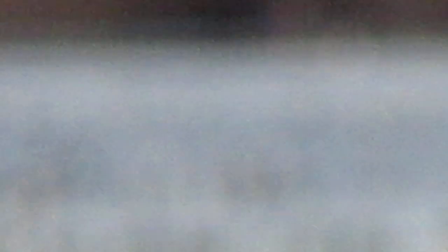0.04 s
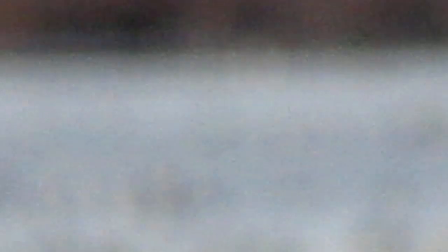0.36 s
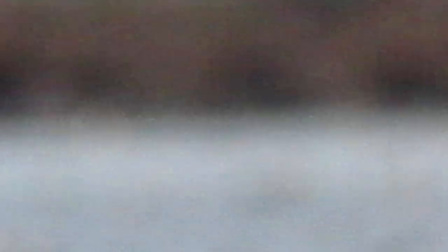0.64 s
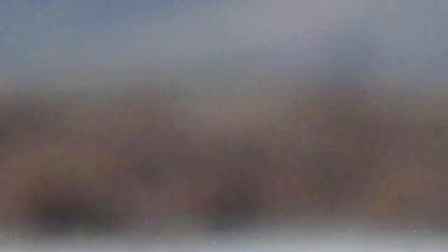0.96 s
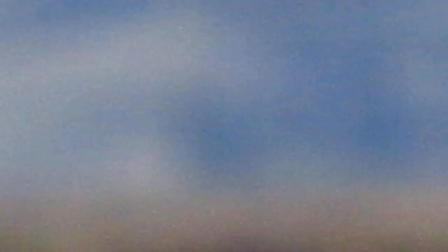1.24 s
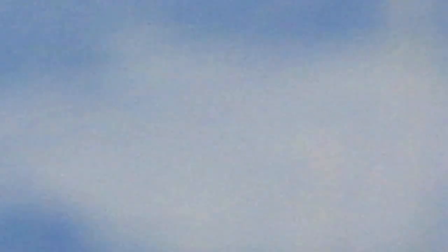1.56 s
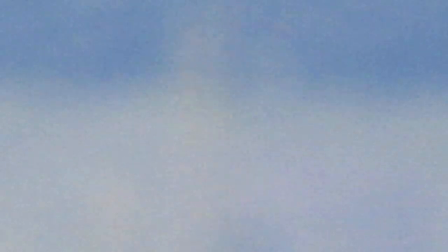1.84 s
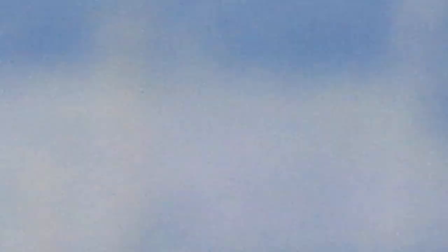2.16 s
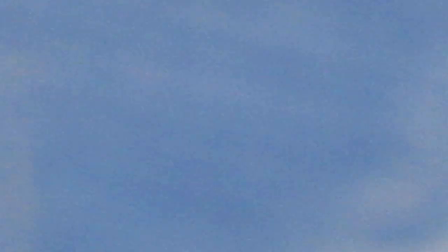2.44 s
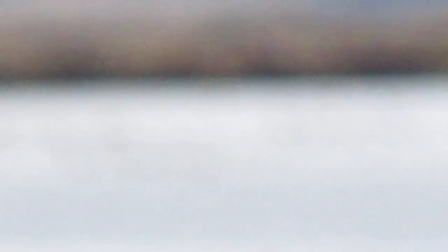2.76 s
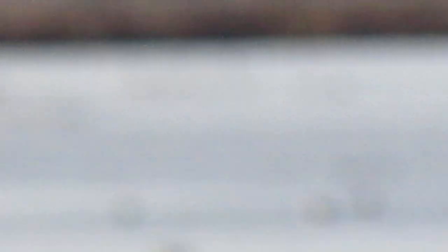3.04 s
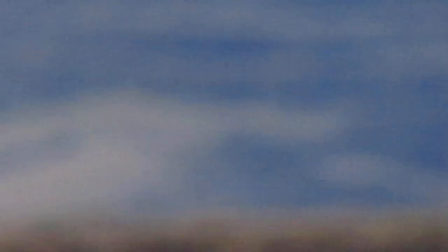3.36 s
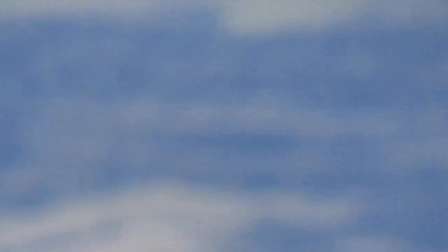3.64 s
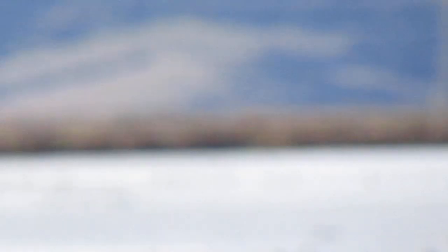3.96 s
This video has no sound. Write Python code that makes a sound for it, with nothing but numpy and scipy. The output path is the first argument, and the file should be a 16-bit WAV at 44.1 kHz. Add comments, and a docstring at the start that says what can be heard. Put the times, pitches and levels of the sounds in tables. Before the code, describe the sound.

A curlew gives a quick run of short rising whistles over open ground, then sparser ones. Strong wind rushes and buffets the microphone throughout. Midway, a hand faintly rubs and taps the camera, with one hard click.

```python
"""From the start, turbulent wind rushes and buffets the microphone, and the camera whines faintly.
A curlew gives a quick run of whistles over open ground, then sparser ones: each tone climbs, breaks
into a higher register, arches and drops. From about 1.9 s a hand rubs and taps the camera, exciting
the modes of its casing; the hard click at 2.2 s makes the gain control duck, hold and recover.
One more whistle follows at once, and a last, faint one sounds through the wind at 3.6 s."""
import sys
import numpy as np
from scipy import signal
from scipy.fft import rfft, irfft, next_fast_len
from scipy.io import wavfile
from scipy.ndimage import uniform_filter1d, minimum_filter1d, map_coordinates

SR = 44100
rng = np.random.default_rng(int(sys.argv[2]) if len(sys.argv) > 2 else 0)


def unload_audio(sound):
    """Save the sound as a 16-bit wav file, at the path given as the first command line argument."""
    columns = np.transpose(np.atleast_2d(sound))
    # keep every value between -1 and 1, then stretch to whole-number steps
    steps = np.round(np.clip(columns, -1, 1) * 32767)
    wavfile.write(sys.argv[1], SR, steps.astype(np.int16))


N = 176400

# Levels in all tables are relative.
# Whistles: start t/s, break t/s, end t/s, opening f/Hz, pre-break f/Hz, top f/Hz, exponent of the climb,
# lower note level/dB, upper note level/dB, lower note's overtone level/dB, lead-in level/dB
CURLEW_WHISTLES = [(.078, .126, .182, 2450, 2810, 3275, .75, -38, -39.3, -20, -50),
                   (.195, .252, .321, 2470, 2790, 3225, 1.5, -40.5, -41.3, -20, -60),
                   (.396, .450, .521, 2360, 2755, 3262, .9, -36.7, -38, -15, -48),
                   (.616, .666, .757, 2440, 2800, 3330, 1.1, -36.3, -41.3, -22, -62),
                   (.790, .820, .856, 2480, 2750, 3190, 1.3, -53, -52, -20, -75),
                   (.875, .915, .953, 2420, 2740, 3155, .6, -38, -41.7, -13, -45.5),
                   (.976, 1.027, 1.114, 2470, 2750, 3275, 1.4, -37.3, -40.5, -21, -57),
                   (1.399, 1.450, 1.526, 2440, 2790, 3365, 1.25, -37.5, -39.3, -21, -62),
                   (1.941, 1.987, 2.061, 2510, 2830, 3435, 1.1, -36.3, -40, -22, -65),
                   (2.344, 2.394, 2.463, 2470, 2800, 3348, 1.6, -37.5, -41.7, -20, -65),
                   (3.590, 3.616, 3.677, 2440, 2700, 3170, 1.6, -47, -48.5, -25, -72)]
RUSH_ENVELOPE = [(0, -30), (.4, -28.5), (.85, -31), (1.2, -30), (1.4, -29), (1.8, -30), (2.1, -30),
                 (2.9, -31), (3.15, -29.5), (3.35, -30.5), (3.6, -30), (4, -31.5)]  # strength of the wind: t/s, level/dB
RUSH_SPECTRUM = [(20, -33.5), (45, -8.5), (80, -6.5), (130, -10.5), (200, -6), (270, -6.5), (360, -7.5),
                 (460, -15), (560, -12.5), (650, -8), (780, -7), (950, -14), (1300, -18.5), (1600, -25.5),
                 (2000, -29.5), (2600, -48.5), (4400, -89)]  # its spectral density: f/Hz, level/dB
WIND_RESONANCES = [(87.5, 23, -41.5), (165.2, 9.4, -35.5), (328.5, 12.7, -39)]  # hollow bands in the wind: f/Hz, half-width/Hz, level/dB
RUSTLE_ENVELOPE = [(0, -63), (.45, -62), (1.15, -63), (1.5, -62.5), (2.1, -61.5), (2.4, -62.5),
                   (2.9, -64.5), (3.5, -64), (4, -64.5)]  # strength of the grass rustle: t/s, level/dB
RUSTLE_SPECTRUM = [(800, -46), (1800, 4), (2500, 5.5), (3400, 1), (4300, -4), (5500, -11.5), (7200, -12.5),
                   (8000, -15.5), (10000, -17), (12000, -20), (14800, -23.5)]  # its spectral density: f/Hz, level/dB
GUST_ENVELOPE = [(0, -28.5), (.6, -33.5), (.72, -26.5), (.88, -30.5), (1.28, -24.5), (1.33, -26.5),
                 (1.45, -22), (1.5, -29.5), (1.7, -25), (1.75, -21.5), (1.92, -24.5), (2.2, -29),
                 (2.7, -28.5), (3.2, -30), (3.28, -21.5), (3.55, -29), (3.7, -25), (4, -27)]  # rumble of gusts on the microphone: t/s, level/dB
GUST_SPECTRUM = [(20, -11.5), (50, -18.5), (88, 2), (125, -4), (170, -4), (260, -5.5), (400, -18.5),
                 (800, -20.5), (2000, -70), (6000, -89.5)]  # its spectral density: f/Hz, level/dB
EDDIES = [(.716, 110, -15.5), (1.33, 104, -12.5), (1.346, 151, -10.5), (1.389, 137, -11), (1.409, 168, -10),
          (1.429, 220, -9.5), (1.436, 129, -9.5), (1.462, 232, -11.5), (1.5518, 746, -16.5),
          (1.733, 103, -17.5), (1.902, 132, -11.5), (2.114, 133, -15.5), (2.444, 96, -16.5),
          (3.267, 140, -16.5), (3.411, 138, -13.5)]  # single eddies at the microphone: t/s, f/Hz, peak level/dB
TAPS = [(1.8735, -23.5), (1.945, -34), (1.9486, -42), (1.9575, -44), (2.0088, -39), (2.0416, -32),
        (2.053, -43), (2.066, -45), (2.0886, -35), (2.1122, -43), (2.2202, 2), (2.2364, -43)]  # contacts on the casing: t/s, level/dB
CASING_MODES = [(700, -20, 0.0073), (1240, -21.5, 0.0101), (1930, -22.5, 0.015), (2415, -22, 0.013),
                (3730, -18, 0.0056), (5050, -24, 0.015), (5990, -22, 0.007), (7140, -14.5, 0.0044),
                (10000, -7.5, 0.0033), (11700, -2, 0.0032), (13100, -13, 0.0044)]  # free vibrations of the casing: f/Hz, level/dB, T60/s
RUB_ENVELOPE = [(1.9, -82), (1.99, -61), (2.08, -55.5), (2.15, -57), (2.2, -56.5), (2.255, -58.5),
                (2.29, -72)]  # friction of the hand: t/s, level/dB
RUB_SPECTRUM = [(2000, -27.5), (5000, -4), (8000, -3), (10000, 2), (12000, -2.5), (14500, -11.5)]  # its spectral density: f/Hz, level/dB
WHIRR_SPELLS = [(1.895, 1.94), (2.43, 2.5), (3.67, 3.75), (3.85, 3.92)]  # the camera's lower tone: start t/s, end t/s


def curlew():
    """Frequency modulation: a soft lead-in, a climbing tone, then a register break to a falling arch."""
    lead_s, attack_s, break_s, drop_s, release_s = .036, .003, .0011, .006, .0054
    lead_hz, rise_hz, drop_hz = 1790, 330, 860
    lead_swell_db, fade_db = 6, 4.5
    jitter, shimmer_db = 1 + .0041 * wobble(250), 1.1 * wobble(150)
    out = np.zeros(N)
    for (start, flip, end, open_hz, break_hz, top_hz, bend,
         lower_db, upper_db, overtone_db, lead_db) in CURLEW_WHISTLES:
        n = np.arange(int((start - lead_s) * SR), int(end * SR))
        t = n / SR
        stages = [(t[0], start), (start, flip), (flip, end)]
        early, low, high = (np.clip((t - a) / (b - a), 0, 1) for a, b in stages)  # progress, 0 to 1
        phase = lambda hz: 2 * np.pi * np.cumsum(hz * jitter[n]) / SR
        slide = phase(lead_hz + rise_hz * early ** 2)
        climb = phase(open_hz + (break_hz - open_hz) * low ** bend)
        arch = phase(top_hz - 290 * (high - .42) ** 2 - drop_hz * np.exp((t - end) / drop_s))
        lead = np.sin(slide) + amp(-10) * np.sin(2 * slide)
        lead *= amp(lead_db + lead_swell_db * (early - .5))
        lower = np.sin(climb) + amp(overtone_db) * np.sin(2 * climb)
        lower *= amp(lower_db - 7 * bend * (1 - low) ** 2)  # swells as it climbs
        upper = np.sin(arch) + amp(-30) * np.sin(2 * arch) + amp(-36) * np.sin(3 * arch)
        upper *= amp(upper_db - fade_db * high)
        onset = np.clip((t - start) / attack_s + .5, 0, 1)
        flipped = .5 + .5 * np.tanh((t - flip) / break_s)  # the registers overlap briefly
        edges = np.clip((t - t[0]) / attack_s, 0, 1) * np.clip((end - t) / release_s, 0, 1)
        voice = (1 - onset) * lead + onset * (1 - flipped) * lower + flipped * upper
        out[n] += np.sqrt(2) * amp(shimmer_db[n]) * edges * voice
    return out


def ground_scatter(x, t60_s=.4, tail_db=-26):
    """Scattering from open ground adds a weak, exponentially decaying tail."""
    t = np.arange(SR // 2) / SR
    tail = rng.standard_normal(len(t)) * amp(-60 * t / t60_s)
    return x + amp(tail_db) * signal.fftconvolve(x, tail / np.linalg.norm(tail))[:N]


def wind():
    """Turbulence gives broadband noise: a rush with narrow resonances, and a faint rustle above it."""
    level = curve(RUSH_ENVELOPE)
    rush = amp(level + 2.5 + .47 * wobble(11)) * coloured(noise(), RUSH_SPECTRUM)
    hollow = sum(amp(db) * unit(filtered(noise(), lambda f: 1 / (1 + ((f - hz) / width) ** 2)))
                 for hz, width, db in WIND_RESONANCES)
    rustle = amp(curve(RUSTLE_ENVELOPE) + 11.5 + .4 * wobble(15)) * coloured(noise(), RUSTLE_SPECTRUM)
    return rush + amp(level - level.mean()) * hollow + rustle


def buffeting():
    """Pressure fluctuations of gusts on the microphone make a low, uneven rumble."""
    level = curve(GUST_ENVELOPE)
    swing = level - level.mean()
    lumps = unit(amp(2.16 * wobble(45)) * coloured(noise(), GUST_SPECTRUM))
    return amp(level.mean() - 3 + 1.02 * swing) * lumps


def eddy_thumps(width_cycles=.22):
    """A passing eddy is a bipolar pressure pulse: one quick pull and push of air."""
    out, t = np.zeros(N), np.arange(-SR // 25, SR // 25) / SR
    for s, hz, db in EDDIES:
        pulse = np.sin(2 * np.pi * hz * t) * np.exp(-.5 * (hz * t / width_cycles) ** 2)
        out[round((s + t[0]) * SR):][:len(t)] += amp(db) * pulse / pulse.max()
    return out


def casing_taps(crack_t60_s=.013):
    """Each impact excites the damped modes of the casing, along with a crack of noise."""
    out, t = np.zeros(N), np.arange(SR // 20) / SR
    ring = sum(amp(db - 60 * t / t60) * np.sin(2 * np.pi * hz * t) for hz, db, t60 in CASING_MODES)
    for s, db in TAPS:
        burst = uniform_filter1d(rng.standard_normal(len(t)), size=2)
        crack = amp(-17.5 - 60 * t / crack_t60_s) * burst
        out[round(s * SR):][:len(t)] += amp(db) * (ring + crack)
    return out


def hand_rubbing(slips_per_s=800, spread_db=6, t60_s=.004, hiss=.55):
    """Stick-slip friction on the casing: each tiny slip is a tick of noise, over a light hiss."""
    slips = (rng.random(N) < slips_per_s / SR) * amp(spread_db * np.clip(noise(), -2, 2))
    decay = amp(-60 * np.arange(SR // 20) / SR / t60_s)
    ticks = signal.fftconvolve(slips, decay)[:N]
    return amp(curve(RUB_ENVELOPE)) * coloured((unit(ticks) + hiss) * noise(), RUB_SPECTRUM)


def camera_whine(whine_hz=11794, whine_db=-69, whirr_hz=8010, whirr_db=-74):
    """Two pure tones superpose: a thin, nearly steady one and a lower one in short spells."""
    out = amp(whine_db) * np.sin(2 * np.pi * np.cumsum(whine_hz + 4 * wobble(30)) / SR)
    for start, end in WHIRR_SPELLS:
        n = np.arange(int(start * SR), int(end * SR))
        out[n] += amp(whirr_db) * signal.windows.tukey(len(n), .5) * np.sin(2 * np.pi * whirr_hz * n / SR)
    return out


def gain_control(x, threshold_db=-6.5, most_db=4, lag_s=.0029, hold_s=.27, recovery_db_per_s=8.5):
    """Compression: the gain ducks just after a peak above the threshold, holds, then recovers."""
    excess_db = np.clip(20 * np.log10(np.abs(x) + 1e-9) - threshold_db, 0, most_db)
    window = 2 * int(hold_s * SR / 2) + 1
    held_db = -minimum_filter1d(-excess_db, window, origin=window // 2)
    ramp_db = recovery_db_per_s * np.arange(N) / SR
    duck_db = np.maximum.accumulate(held_db + ramp_db) - ramp_db
    pole = np.exp(-1 / (lag_s * SR))
    return x * amp(-signal.lfilter([1 - pole], [1, -pole], duck_db))


def amp(db):
    """Decibels as an amplitude ratio."""
    return 10 ** (np.asarray(db) / 20)


def unit(x):
    """Normalisation to rms 1."""
    return x / np.sqrt(np.mean(x ** 2) + 1e-20)


def curve(rows):
    """Linear interpolation of (t/s, value) rows at every sample."""
    return np.interp(np.arange(N) / SR, *np.transpose(rows))


def wobble(knots_per_s):
    """Smooth random modulation: a spline through Gaussian knots."""
    knots = rng.standard_normal(int(N * knots_per_s / SR) + 4)
    return map_coordinates(knots, [np.arange(N) * knots_per_s / SR])


def filtered(x, response):
    """Linear filtering: the spectrum times a frequency response."""
    size = next_fast_len(N + SR // 2)
    return irfft(rfft(x, size) * response(np.fft.rfftfreq(size, 1 / SR)), size)[:N]


def coloured(x, points):
    """Spectral shaping by (f/Hz, level/dB) points, at rms 1."""
    f, db = np.transpose(points)
    return unit(filtered(x, lambda hz: amp(np.interp(np.log(hz + 1), np.log(f + 1), db))))


def noise():
    """Gaussian white noise."""
    return rng.standard_normal(N)


def scene():
    """Superposition of bird, wind and camera at one microphone."""
    bird = amp(-.5) * ground_scatter(curlew())
    mix = bird + wind() + buffeting() + eddy_thumps() + casing_taps() + hand_rubbing() + camera_whine()
    return mix[None]


def record(dry, cutoff_hz=14700):
    """Range and bandwidth are limited: gain control, clipping at full scale, then a steep low-pass."""
    limited = np.clip(gain_control(dry[0]), -1, 1)
    return filtered(limited, lambda hz: 1 / np.sqrt(1 + (hz / cutoff_hz) ** 120))[None]


dry = scene()
out = record(dry)
unload_audio(out)
```